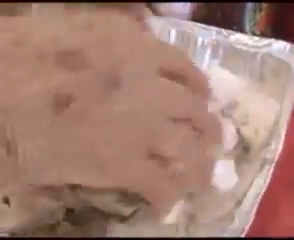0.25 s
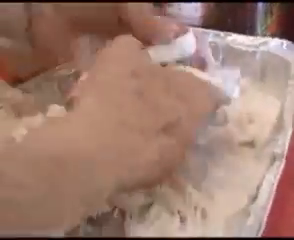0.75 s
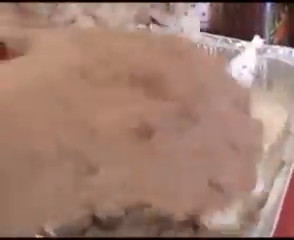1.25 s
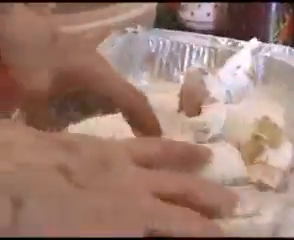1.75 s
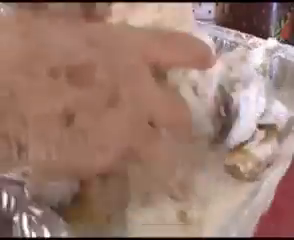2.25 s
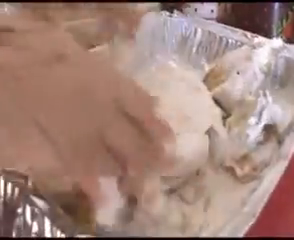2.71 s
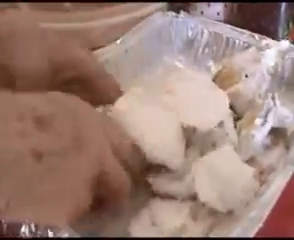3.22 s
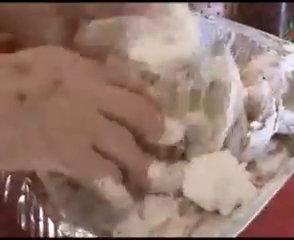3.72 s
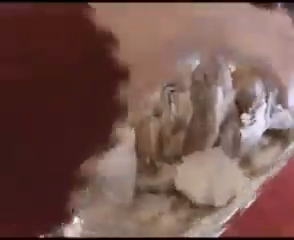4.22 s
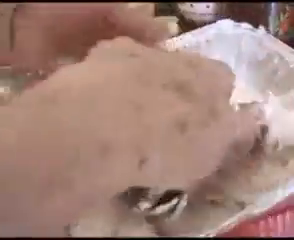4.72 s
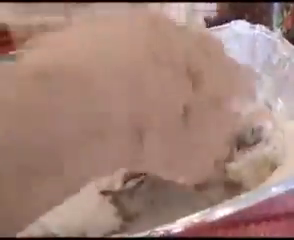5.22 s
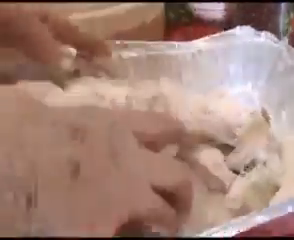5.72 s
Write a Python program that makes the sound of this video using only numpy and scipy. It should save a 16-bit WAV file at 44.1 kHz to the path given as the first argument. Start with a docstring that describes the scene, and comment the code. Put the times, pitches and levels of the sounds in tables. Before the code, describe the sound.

Hands turn floured food in a thin foil tray, close up, with irregular crackling snaps, dry scraping strokes and a few dull thumps.

```python
"""Hands turn floured food in a thin foil tray on a kitchen table, close by, over a low steady room tone.
From the start, flickering noise bands scrape and hiss in strokes, and the tray's creases snap: clicks with
rattles, filtered by panel resonances. Soft thumps of decaying tray modes begin at once too.
Gliding two-mode groans join at 0.4 s and hollow knocks of falling pitch come at 1.2 s.
Two loud thumps follow each other at about 2.5 s; snaps and strokes go on to the end."""
import sys
import numpy as np
from scipy import signal
from scipy.fft import rfft, irfft, next_fast_len
from scipy.io import wavfile

SR = 44100
rng = np.random.default_rng(int(sys.argv[2]) if len(sys.argv) > 2 else 0)


def pcm_store(signal):
    """Save signal as 16-bit PCM."""
    levels = np.round(np.clip(np.atleast_2d(signal), -1, 1) * 32767)
    wavfile.write(sys.argv[1], SR, levels.astype(np.int16).T)


N = 262766
T = np.arange(N) / SR
TOP_HZ = 12200  # upper band limit

# spectrum of a sharp foil crack: (frequency [Hz], density [dB])
CRACK_SPECTRUM = [(100, -58), (1000, -10.5), (2500, 0), (5000, -2.5), (8000, -11), (12000, -17),
                  (16000, -71)]
# spectrum of scraped foil: (frequency [Hz], density [dB])
SCRAPE_SPECTRUM = [(200, -8.5), (450, -7.5), (580, -2), (1050, 0.5), (2000, -4), (4000, -12.5), (8000, -27)]


def undb(db):
    """Decibels to amplitude gain."""
    return 10 ** (np.asarray(db) / 20)


def unit(x):
    """Scale to rms 1."""
    return x / np.sqrt(np.mean(x ** 2))


def bins(size):
    """Frequencies [Hz] of a real spectrum, kept above zero."""
    return np.maximum(np.fft.rfftfreq(size, 1 / SR), 1)


def colour(points, hz):
    """Gain of a (Hz, dB) spectrum at the given frequencies, interpolated over log frequency."""
    points_hz, points_db = np.transpose(points)
    return undb(np.interp(np.log(hz), np.log(points_hz), points_db))


def tint(x, points):
    """Filter a signal by a (Hz, dB) spectrum."""
    size = next_fast_len(N)
    return irfft(rfft(x, size) * colour(points, bins(size)), size)[..., :N]


def ring(gain):
    """Minimum-phase impulse response of this magnitude: sudden start, natural decay."""
    cepstrum = irfft(np.log(gain + 1e-6))
    half = len(cepstrum) // 2
    # fold onto positive time
    cepstrum[1:half] *= 2
    cepstrum[half + 1:] = 0
    return irfft(np.exp(rfft(cepstrum)))


def walk(rate_hz):
    """Normal random values at this rate, joined by straight lines."""
    knots = rng.standard_normal(size=4096)
    return np.interp(T * rate_hz, np.arange(len(knots)), knots)


def kitchen(level_db=-44, side_db=-5):
    """Steady background of the room: mid and side noise, arriving from all around."""
    # room tone: (frequency [Hz], density [dB])
    room_tone = [(22, -61.5), (300, -71.5), (750, -83), (1250, -71), (1900, -76.5), (3400, -77.5),
                 (4300, -109), (12000, -100)]
    mid, side = (unit(tint(rng.standard_normal(N), room_tone)) for _ in range(2))
    return undb(level_db) * (mid + undb(side_db) * side * np.array([[1], [-1]]))


def hiss(hiss_db=-60):
    """Each microphone adds its own faint hiss."""
    spectrum = [(2000, -16), (5000, 11), (8000, 1), (12000, -20)]  # (Hz, dB)
    return undb(hiss_db) * unit(tint(rng.standard_normal((2, N)), spectrum))


def handling(attack_s=0.073, sag_db_per_s=3.5, release_db_per_s=139):
    """Levels [dB] of foil, flour and food: strokes swell, ease and die away; overlaps add in power."""
    # hand strokes: (time at full strength [s], length [s],
    #                foil scraping [dB], flour hiss [dB], food shifting [dB]), before trims
    strokes = [(0.0, 0.095, -32.5, -31, -26), (0.183, 0.1, -40, -69, -42), (0.425, 0.16, -25, -27.5, -32),
               (0.65, 0.026, -23.5, -22, -27), (0.81, 0.09, -43, -37.5, -62), (1.009, 0.006, -36, -31, -38),
               (1.085, 0.073, -35.5, -36, -36.5), (1.288, 0.038, -36, -52, -34),
               (1.486, 0.014, -26.5, -47, -25), (1.564, 0.1, -27, -37.5, -30),
               (1.724, 0.16, -25, -26.5, -34.5), (1.967, 0.14, -32, -34.5, -58),
               (2.21, 0.16, -31, -35, -40), (2.567, 0.05, -40.5, -38.5, -27),
               (2.943, 0.11, -30, -19.5, -35.5), (3.14, 0.049, -24, -23.5, -27.5),
               (3.253, 0.1, -27.5, -27.5, -37.5), (3.38, 0.096, -39, -42, -48),
               (3.72, 0.37, -43.5, -53, -40.5), (3.84, 0.09, -54, -38, -58),
               (4.351, 0.024, -24.5, -32, -29.5), (4.464, 0.73, -31, -37, -39),
               (4.579, 0.19, -27.5, -32, -49), (4.838, 0.1, -37.5, -56, -50),
               (5.277, 0.069, -36, -33, -37.5), (5.545, 0.022, -44, -71, -33), (5.65, 0.19, -24, -26, -34),
               (5.885, .07, -29.5, -34.5, -38)]
    # the hands never lie quite still: (foil scraping [dB], flour hiss [dB], food shifting [dB])
    resting_db = (-46, -51, -50)
    power = undb(resting_db)[:, None] ** 2
    for start_s, length_s, *levels_db in strokes:
        age_s = T - start_s
        swell = np.clip(1 + age_s / attack_s, 0, 1) ** 2
        sag_db = sag_db_per_s * np.clip(age_s, 0, length_s)
        release_db = release_db_per_s * np.maximum(age_s - length_s, 0)
        power = power + np.outer(undb(levels_db), swell * undb(-sag_db - release_db)) ** 2
    return 10 * np.log10(power)


def grains(rate_hz, spread_db, smooth):
    """Countless tiny random slips of uneven size, over the noise blur of the smallest."""
    hit = rng.random(N) < rate_hz / SR
    sizes = undb(spread_db * np.minimum(rng.exponential(size=N), 5)) * rng.choice([-1, 1], N)
    return unit(hit * sizes) + smooth * rng.standard_normal(N)


def rustle(points, rate_hz, spread_db, smooth, flicker_db, count=8):
    """Every slip rings its own patch of foil, so each octave crackles and flickers by itself."""
    size = next_fast_len(N)
    hz = bins(size)
    octave = np.log2(hz / TOP_HZ) + count - 1
    spectrum = 0
    for k in range(count):
        slips = grains(rate_hz, spread_db, smooth) * undb(flicker_db * walk(45))
        band = np.sqrt(np.maximum(1 - np.abs(octave - k), 0))  # neighbours add to constant power
        spectrum = spectrum + rfft(slips, size) * band
    return unit(irfft(spectrum * colour(points, hz), size)[:N])


def jerks(rate_hz=120, depth=0.95, slip_s=0.0044):
    """Stick and slip: the drag leaps each time a piece lets go, then settles at once."""
    slips = (rng.random(N) < rate_hz / SR) * rng.random(N)
    settling = np.exp(-T[:SR // 20] / slip_s)
    return unit(1 + depth * signal.fftconvolve(slips, settling)[:N])


def stirring(foil_level_db, flour_level_db, food_level_db,
             scrape_db=0, flour_db=-0.5, food_db=-2, crinkle_db=-9.5):
    """Floured food drags over the foil in jerks and ticks its wrinkles; powder hisses, pieces shift dully."""
    # hissing powder: (frequency [Hz], density [dB])
    flour_spectrum = [(800, 3), (3000, 4.5), (7000, 1), (10000, -2.5), (12500, -10)]
    # dull shifting pieces: (frequency [Hz], density [dB])
    food_spectrum = [(20, -6), (72, 14.5), (115, 1), (300, 8), (500, 3), (1000, -45)]
    scrape = rustle(SCRAPE_SPECTRUM, rate_hz=600, spread_db=2.0, smooth=0.59, flicker_db=1.5)
    scrape = scrape * undb(foil_level_db + scrape_db)
    flour = rustle(flour_spectrum, rate_hz=2500, spread_db=-0.5, smooth=0.93, flicker_db=4.0)
    flour = flour * undb(flour_level_db + flour_db)
    food = unit(tint(rng.standard_normal(N), food_spectrum)) * undb(food_level_db + food_db)
    # each tiny wrinkle rattles for about a millisecond
    t = T[:SR // 20]
    wrinkle = rng.standard_normal(len(t)) * np.exp(-t / 0.00037)
    ticks = signal.fftconvolve(grains(rate_hz=120, spread_db=1.5, smooth=0), wrinkle)[:N]
    crinkle_level_db = (foil_level_db + flour_level_db) / 2 + crinkle_db
    crinkle = unit(tint(ticks, CRACK_SPECTRUM)) * undb(crinkle_level_db)
    return jerks() * (scrape + flour + food + crinkle)


def snaps(load_db, rattle=1.56, sharpness=2.8, creak=0.27, lead=0.36, size=2048,
          floor_db=-5, floor_db_per_load_db=1, floor_db_per_octave=-5, middle_panel_hz=1200):
    """A crease creaks under load and flips with a click; bending waves then rattle across the wrinkles."""
    # snapping creases: (time [s], level over 10 ms [dB], pitch of the buckling panel [Hz],
    #                    sharp crack against the panel [dB], rattle decay time [s])
    creases = [(0.0076, -16.5, 1640, -0.5, 0.004), (0.0842, -16.5, 1730, 0.5, 0.0024),
               (0.1847, -25, 2140, -33, 0.0025), (0.1888, -19, 1620, -34, 0.0052),
               (0.351, -30.5, 2820, -17, 0.0059), (0.3704, -29, 2430, -16, 0.0037),
               (0.403, -12.5, 1070, -1.5, 0.0064), (0.427, -13.5, 790, 1.5, 0.003),
               (0.4527, -15, 1000, 0, 0.0036), (0.482, -12, 1010, -4.5, 0.0032),
               (0.5118, -16.5, 990, -10, 0.0094), (0.6376, -18.5, 2500, 3, 0.0045),
               (0.6474, -14.5, 840, 17, 0.0025), (0.6588, -19, 1110, -5, 0.0018),
               (0.68, -15.5, 1610, 0, 0.0075), (0.692, -16, 2270, 7, 0.0022),
               (0.7041, -14.5, 950, 0.5, 0.0029), (0.722, -26, 2700, -2, 0.0014),
               (0.7327, -18, 1310, 5, 0.0028), (0.794, -16, 5350, -5.5, 0.003),
               (0.852, -16, 5000, 2, 0.0041), (1.0212, -25, 2880, 5, 0.002),
               (1.0445, -21.5, 2740, -25, 0.0036), (1.098, -23.5, 2840, 13, 0.003),
               (1.1252, -21, 2720, -22, 0.005), (1.3211, -31.5, 1440, -21, 0.0013),
               (1.337, -28.5, 1200, -14, 0.0016), (1.4572, -11.5, 960, 0, 0.012),
               (1.486, -12.5, 660, 4, 0.0038), (1.5465, -14.5, 1060, 0, 0.0026),
               (1.5833, -15.5, 1010, -8, 0.0055), (1.6738, -17, 1150, -9, 0.0068),
               (1.723, -15, 1000, -9, 0.011), (1.822, -15.5, 1250, 20, 0.0029),
               (1.878, -19, 1170, -6, 0.0033), (1.8819, -11, 1200, 4, 0.0053),
               (1.8882, -14.5, 2360, 3, 0.0021), (1.9428, -10, 940, 1.5, 0.01),
               (1.9556, -9.5, 1840, -3, 0.0012), (2.086, -27.5, 1480, 4, 0.0026),
               (2.406, -26, 1194, -0.5, 0.0022), (2.43, -25.5, 1030, 2, 0.0021),
               (2.9453, -13, 1040, -26, 0.0075), (2.9556, -12.5, 1400, 1.5, 0.0057),
               (2.9805, -27, 1500, 2, 0.002), (3.0161, -11.5, 990, -33, 0.011),
               (3.0284, -11, 1820, 1, 0.0069), (3.0518, -16, 1460, 7, 0.0054),
               (3.131, -16.5, 1800, 6, 0.009), (3.1944, -21.5, 780, -15, 0.0062),
               (3.2673, -17.5, 1730, 11, 0.0023), (3.2763, -15, 2530, 11, 0.0046),
               (3.2892, -13, 2300, 0, 0.0024), (3.34, -18.5, 1400, -1, 0.0053),
               (3.3592, -19.5, 1310, -1, 0.0022), (3.968, -25, 2640, -2, 0.0089),
               (3.982, -29, 2000, -8, 0.0041), (3.986, -19, 1070, -22, 0.0058),
               (4.0417, -24.5, 2380, -2.5, 0.01), (4.0564, -27, 1810, -12, 0.0036),
               (4.0603, -18.5, 935, -29, 0.008), (4.3302, -21.5, 1080, -13, 0.0058),
               (4.347, -24, 990, -7, 0.0034), (4.374, -17.5, 2000, -1, 0.0073),
               (4.3951, -17, 1630, -2.5, 0.0068), (4.727, -24, 686, -3, 0.0023),
               (4.781, -27, 1410, -5, 0.0011), (4.8098, -21.5, 970, 1, 0.0044),
               (4.8377, -19, 1180, -21, 0.00091), (4.8691, -23, 900, 3, 0.0028),
               (4.8794, -17.5, 1460, -24, 0.0021), (4.899, -17, 1130, -32, 0.001),
               (4.945, -15.5, 1270, -32, 0.0019), (5.2057, -20.5, 980, -6.5, 0.004),
               (5.2115, -21.5, 980, -6.5, 0.018), (5.2628, -27, 4800, 0, 0.0028),
               (5.2732, -25, 1000, 10, 0.0054), (5.3218, -15.5, 1540, 3, 0.0022),
               (5.338, -14.5, 1410, -5.5, 0.004), (5.616, -18.5, 1700, -10, 0.0089),
               (5.6619, -12, 1380, -25, 0.0056), (5.6721, -19, 2030, -11, 0.0046),
               (5.707, -11.5, 1320, -32, 0.007), (5.72, -18.5, 2250, -24, 0.0016),
               (5.8319, -18.5, 1290, -6, 0.002), (5.8929, -17.5, 1110, -4, 0.0064)]
    # shaken tray floor: (frequency [Hz], density [dB])
    floor_spectrum = [(20, -35), (75, -11.5), (150, 0), (310, 3.5), (430, -12), (590, 12.5), (1500, -40),
                      (8000, -107)]
    out, hz, before = np.zeros(N + 2 * size), bins(size), size // 8
    t = (np.arange(size) - before) / SR
    chance = rng.standard_normal((len(creases), size))
    chance = chance * np.sqrt(np.abs(chance))  # a few wrinkles click much harder than the rest
    crack, floor = unit(colour(CRACK_SPECTRUM, hz)), unit(colour(floor_spectrum, hz))
    for (time_s, level_db, panel_hz, sharp_db, rattle_s), noise in zip(creases, chance):
        # shifting food shakes the floor more; smaller, higher panels shake it less
        deep_db = floor_db + floor_db_per_load_db * np.interp(time_s, T, load_db)
        deep_db += floor_db_per_octave * np.log2(panel_hz / middle_panel_hz)
        # flour damps the panel, so that its resonance is broad
        resonance = 1 / np.hypot(1, sharpness * (hz / panel_hz - panel_hz / hz))
        panel = unit(resonance / np.hypot(1, hz / (2 * panel_hz)))
        power = panel ** 2 + (undb(sharp_db) * crack) ** 2 + (undb(deep_db) * floor) ** 2
        age = np.abs(t) / rattle_s
        push = noise * np.where(t < 0, creak * np.exp(-age / lead), np.exp(-age))
        # the longer the rattle, the more it outweighs the first click
        push *= rattle * np.sqrt(rattle_s / 0.0043) / np.linalg.norm(push)
        push[before] += 1  # click
        snap = signal.fftconvolve(push, ring(np.sqrt(power)))[:size]
        start = max(int(time_s * SR), 0)
        out[start:start + size] += snap / np.linalg.norm(snap) * undb(level_db) * np.sqrt(.01 * SR)
    return out[before:before + N]


def thumps(tick_db=-23, tick_s=0.0069, contact_s=0.0037, wander=0.04):
    """The weighted tray booms briefly on the table, and its foil ticks with each blow."""
    # soft blows on the loaded tray: (time [s], level [dB])
    blows = [(0.009, -9), (0.0858, -12), (0.121, -13.5), (1.045, -13), (1.125, -12.5), (1.168, -16),
             (2.5373, -1), (2.5729, -3), (2.587, -23), (2.621, -14.5), (3.143, -15), (3.174, -19)]
    # modes of the loaded tray: (frequency [Hz], level [dB], decay time to -60 dB [s])
    modes = [(78, -17.5, 0.17), (197, -9, 0.064), (291, -22, 0.53), (305, 3.5, 0.037), (373, -25, 0.083),
             (457, -19, 0.035)]
    out, t = np.zeros(N), T[:SR // 2]
    boom = 0
    for hz, mode_db, t60_s in modes:
        # the load keeps settling, so each mode wanders in pitch
        cycles = hz * np.cumsum(1 + wander * walk(50)[:len(t)]) / SR
        boom = boom + undb(mode_db) * np.sin(2 * np.pi * cycles) * undb(-60 * t / t60_s)
    boom *= 1 - np.exp(-t / contact_s)  # the soft load takes a moment to press home
    foil = unit(tint(rng.standard_normal(N), SCRAPE_SPECTRUM))
    for time_s, level_db in blows:
        start = int(time_s * SR)
        span = slice(start, start + len(t))
        tick = undb(tick_db) * foil[span] * np.exp(-t / tick_s)
        out[span] += undb(level_db) * (tick - boom)
    return out


def groans(attack_s=0.0043, release_s=0.0038, overtone=1.6, overtone_db=-10, size=512):
    """Friction keeps a panel ringing unevenly in two modes, which slide together as its tension changes."""
    # panels under a dragged piece: (time [s], length [s], level [dB], first pitch [Hz], last pitch [Hz],
    #                                bandwidth as a share of the pitch [ratio])
    drags = [(0.409, 0.15, -28.5, 740, 703, 0.58), (1.656, 0.15, -28, 1100, 1016, 0.4),
             (3.076, 0.056, -28, 1260, 1403, 0.84), (3.128, 0.021, -20.5, 1955, 993, 0.31),
             (3.16, 0.013, -16, 1600, 1052, 0.35), (3.17, 0.018, -19.5, 712, 710, 0.72),
             (5.208, 0.125, -43, 888, 1470, 0.25), (5.329, 0.023, -30, 1635, 1420, 0.1)]
    out, t = np.zeros(N), T[:SR // 4]
    chance = rng.standard_normal((len(drags), 2, 2, size))
    for (time_s, length_s, level_db, first_hz, last_hz, width), draws in zip(drags, chance):
        pitch_hz = first_hz * (last_hz / first_hz) ** np.minimum(t / length_s, 1)
        cycles = np.cumsum(pitch_hz) / SR
        ringing = 0
        for ratio, gain, (real, imag) in zip((1, overtone), (1, undb(overtone_db)), draws):
            grip = np.interp(ratio * cycles * width, np.arange(size), real + 1j * imag)
            grip = grip / np.hypot(1, np.abs(grip))  # friction can only push so hard
            mode = np.real(grip * np.exp(2j * np.pi * ratio * cycles))
            ringing = ringing + gain * unit(mode)
        held = np.minimum(t / attack_s, 1) * np.exp(-np.maximum(t - length_s, 0) / release_s)
        start = int(time_s * SR)
        out[start:start + len(t)] += undb(level_db) * ringing * held / np.std(ringing[t < length_s])
    return out


def knocks(sag=0.15, decay_s=0.0027, tail_db=-21, tail_s=0.039):
    """The panel slackens as it pops over, so its tone drops quickly; it shudders on unevenly."""
    # panels popping over under a soft piece: (time [s], level [dB], first pitch [Hz])
    pops = [(1.2091, -9, 744), (1.2154, -3.5, 642)]
    out, t = np.zeros(N), T[:SR // 4]
    for time_s, level_db, first_hz in pops:
        pitch_hz = first_hz * (1 - sag * (1 - np.exp(-2 * t / tail_s)))
        cycles = np.cumsum(pitch_hz) / SR
        shudder = undb(tail_db) * walk(first_hz / 2)[:len(t)] * np.exp(-t / tail_s)
        fade = (np.exp(-t / decay_s) + shudder) * np.minimum(cycles, 1)  # rises over the first cycle
        start = int(time_s * SR)
        out[start:start + len(t)] += undb(level_db) * fade * np.sin(2 * np.pi * cycles)
    return out


def room(x, wet_db=-21, t60_s=0.91, near_s=0.016):
    """Faint echo comes from all around; nearby reflections tell left from right, mostly in the treble."""
    # reflections of opposite sign left and right: (frequency [Hz], gain [dB])
    nearby_gain = [(280, -19), (470, -13), (950, -20), (1500, -16), (3200, -28), (7500, -10.5)]
    t = T[:SR // 2]
    decays = np.array([undb(-60 * t / t60_s), undb(-60 * t / t60_s), np.exp(-t / near_s)])
    paths = rng.standard_normal(decays.shape) * decays * (t > .002)  # silent for the first 2 ms
    left, right, near = (signal.fftconvolve(x, h / np.linalg.norm(h))[:N] for h in paths)
    side = tint(near, nearby_gain)
    return x + undb(wet_db) * np.array([left, right]) + np.array([side, -side])


def scene(snap_db=0, pan_db=-0.57):
    """Tray sounds in the room, over background and hiss; the balance leans just right of centre."""
    foil_level_db, flour_level_db, food_level_db = handling()
    tray = stirring(foil_level_db, flour_level_db, food_level_db)
    tray = tray + undb(snap_db) * snaps(food_level_db - foil_level_db)
    tray = tray + thumps() + groans() + knocks()
    balance = undb(np.array([[pan_db], [-pan_db]]) / 2)
    return (room(tray) + kitchen() + hiss()) * balance


def record(dry):
    """The sharpest peaks overload the recorder, which also cuts the top."""
    clipped = np.clip(dry, -.8, .8)
    lowpass = signal.ellip(8, .2, 80, TOP_HZ, fs=SR, output="sos")
    return signal.sosfilt(lowpass, clipped)


dry = scene()
out = record(dry)
pcm_store(out)
```